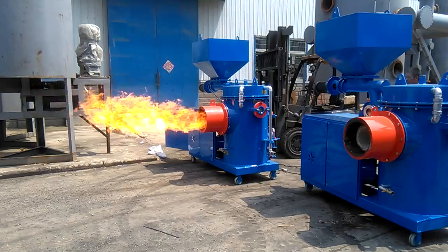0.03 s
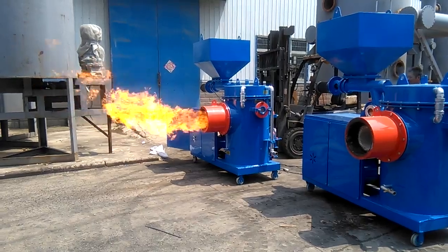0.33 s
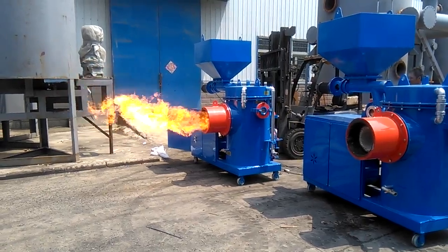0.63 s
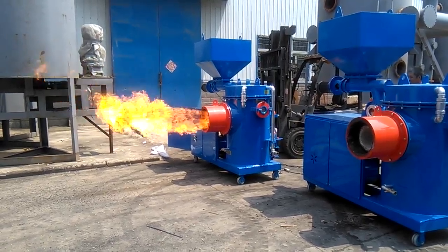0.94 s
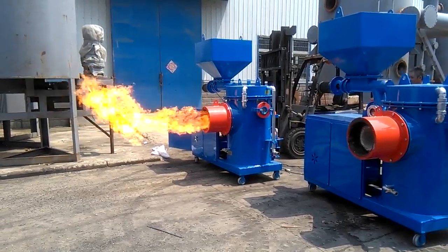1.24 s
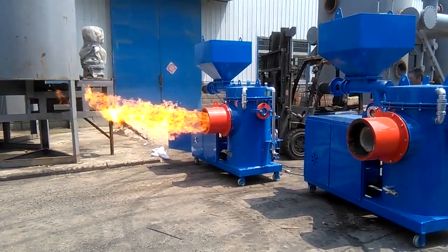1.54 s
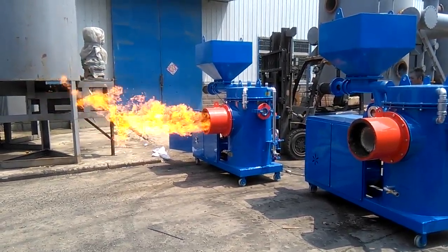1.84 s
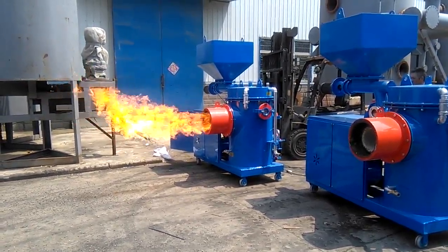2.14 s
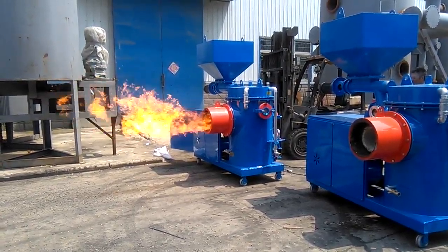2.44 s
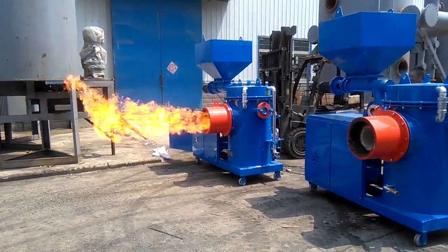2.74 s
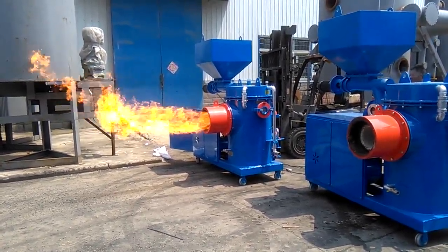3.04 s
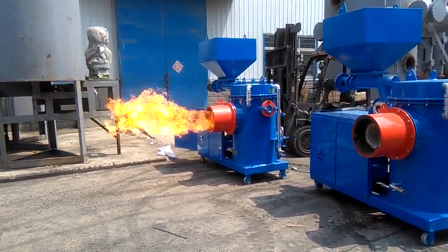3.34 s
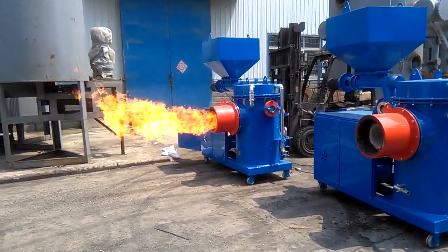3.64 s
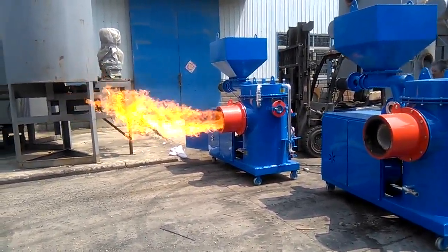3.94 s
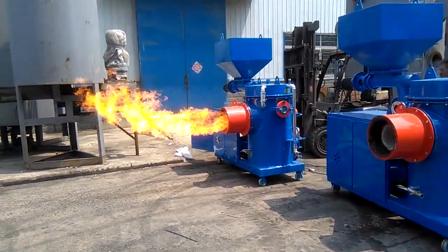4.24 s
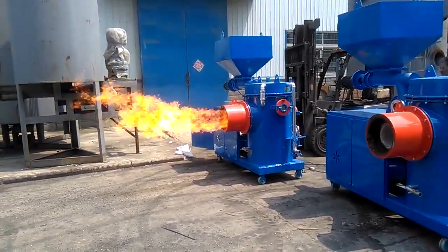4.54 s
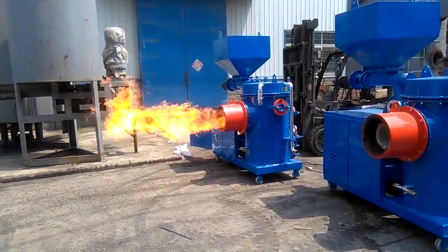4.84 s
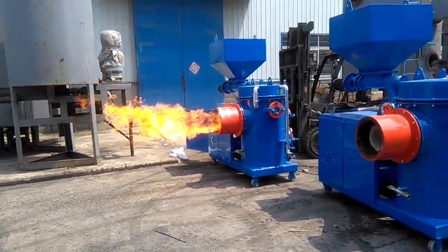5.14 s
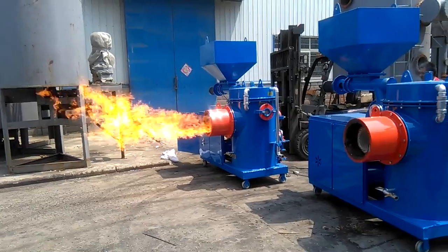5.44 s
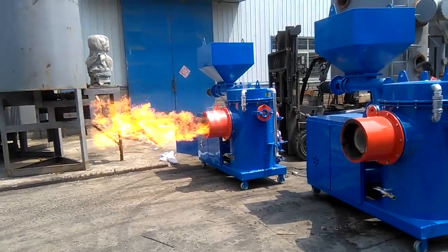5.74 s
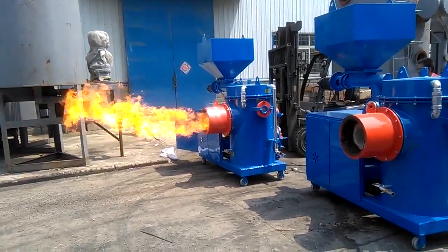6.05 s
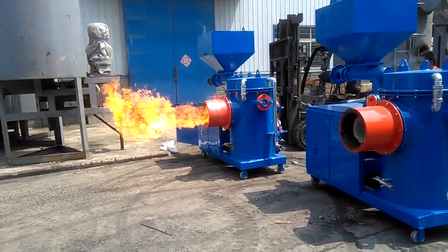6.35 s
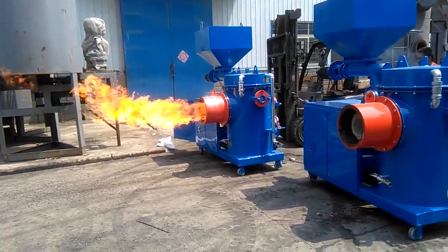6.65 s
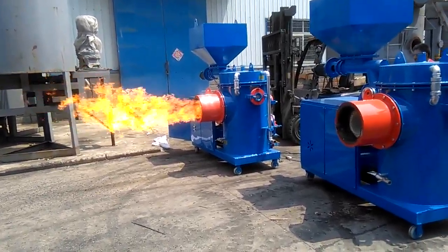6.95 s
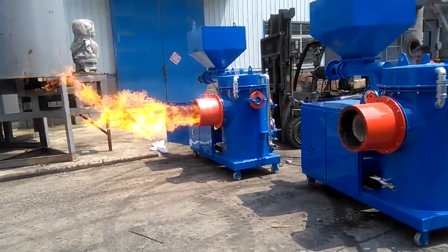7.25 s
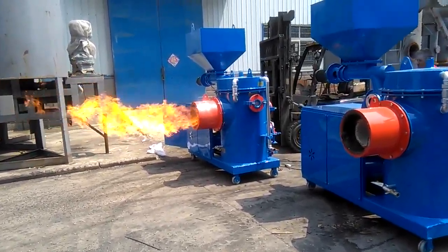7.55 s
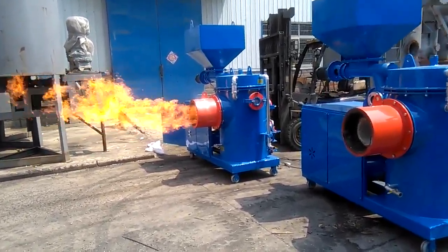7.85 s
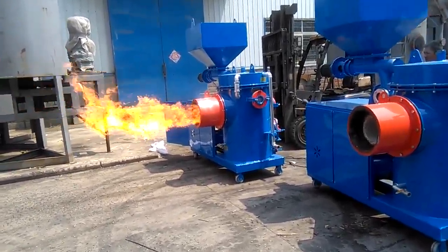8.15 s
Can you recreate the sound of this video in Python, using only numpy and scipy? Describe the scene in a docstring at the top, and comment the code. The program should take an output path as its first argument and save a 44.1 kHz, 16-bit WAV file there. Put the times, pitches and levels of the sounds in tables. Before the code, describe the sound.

A pellet burner runs outdoors, a few metres from a hand-held phone. Its flame rumbles, flares and hoots hollowly in its tube while a blower rushes and faintly whistles, starting abruptly and loud, then turning quieter and duller. Wind buffets the microphone around three seconds in. A thin, high rustle of sliding pellets runs underneath, and faint wavering hollow notes come and go in the second half.

```python
"""A factory yard, where a pellet burner throws a long flame a few metres from a hand-held phone. The flame
rumbles in uneven eddies and rings its fire tube like a big pipe. Air from the blower rushes and whistles. At
about 2 s the sound drops sharply and stays quieter. Pellets rustle down the steel feed chute, and a gust of
wind thumps the microphone. The sound starts abruptly."""
import sys
import numpy as np
from scipy import signal
from scipy.fft import rfft, irfft, next_fast_len
from scipy.io import wavfile
from scipy.ndimage import uniform_filter1d

SR = 44100
rng = np.random.default_rng(int(sys.argv[2]) if len(sys.argv) > 2 else 0)


def output_pcm(signal):
    """Save a mono or channel-first signal as 16-bit PCM at the path in sys.argv[1].

    Samples are clipped to [-1, 1] before scaling.
    """
    pcm = np.clip(np.atleast_2d(signal).T, -1, 1) * 32767
    wavfile.write(sys.argv[1], SR, np.round(pcm).astype(np.int16))


N = 370881
TIME = np.arange(N) / SR
SIZE = next_fast_len(N, True)
FREQ = np.maximum(np.fft.rfftfreq(SIZE, 1 / SR), 1)
FLICKER_PER_S, SWIRL_DB = 11.8, 2.0  # how fast the flame licks; how much hot air bends the levels

# The levels are high at first, then drop suddenly at about 2 s. # Each row: time in seconds, then the levels of
# rumble, drone, roar and howl in dB.
FIRE_LEVELS = [(.63, -26.5, -36, -42.5, -46.5), (1.1, -28.5, -35.5, -40.5, -44.5),
               (1.95, -28, -36.5, -44.5, -42.5), (2.25, -40.5, -47, -47, -71),
               (2.55, -39.5, -48.5, -49.5, -49.5), (2.8, -41, -34, -52.5, -52.5),
               (3.25, -32.5, -35.5, -47.5, -50.5), (3.52, -37, -43, -48.5, -53),
               (4.02, -42.5, -38, -52, -47.5), (4.4, -34.5, -39.5, -45.5, -45), (4.75, -37, -36, -52, -43),
               (5.05, -39, -41, -50.5, -47.5), (5.8, -39.5, -38, -55, -47), (6.15, -44, -38.5, -53.5, -47),
               (6.6, -37.5, -34.5, -56, -49.5), (7.05, -40, -46, -52.5, -46.5),
               (7.7, -38, -40, -47.5, -48.5), (8.1, -37.5, -41.5, -45, -47.5),
               (8.41, -39.5, -41.5, -47.5, -50)]
# Big pockets of gas flare up. Each row: peak time and fade in seconds, thud and boom levels in dB.
FLARES = [(1.115, 0.041, -27, -26.5), (1.389, 0.017, -30, -30.5), (1.555, 0.024, -24, -30.5),
          (1.86, 0.034, -28, -30), (2.59, 0.057, -32, -55), (3.41, 0.017, -31, -37),
          (3.65, 0.035, -32, -41), (4.375, 0.023, -27.5, -42), (4.555, 0.018, -43, -31),
          (4.781, 0.018, -49, -32), (5.36, 0.042, -34.5, -56), (5.7, 0.041, -37, -31),
          (5.781, 0.025, -30, -47), (5.929, 0.01, -29, -33), (5.98, 0.02, -28, -41),
          (6.31, 0.068, -35.5, -35.5), (6.59, 0.043, -47, -37), (6.7, 0.03, -38, -38.5),
          (7.17, 0.016, -32, -44), (7.365, 0.031, -34, -55), (7.515, 0.025, -28.5, -35.5),
          (7.56, 0.042, -41, -35.5), (7.79, 0.04, -31, -42), (7.96, 0.019, -35, -43),
          (8.2, .024, -35.5, -51)]
# The fire tube catches and hoots. Each row: peak time in seconds, level in dB.
HOOTS = [(.8, -40), (1.0, -43), (1.422, -34), (3.25, -41), (3.53, -45), (4.191, -35.5), (4.419, -35),
         (5.289, -36.5), (5.41, -33.5), (6.67, -40), (7.2, -56), (7.79, -37), (7.97, -43), (8.31, -40.5),
         (8.371, -39.5)]
def flame():
    """Pockets of gas ignite: big ones rumble, smaller ones flutter and ring the chamber and the tube."""
    rumble_db, drone_db, roar_db, howl_db = curves(FIRE_LEVELS)
    flutter = undb(1.7 * walk(42))
    rumble, drone = deep_rumble(), chamber_drone(flutter)
    roar, howl = broad_roar(flutter), tube_howl(flutter)
    thuds = [(s, fade_s, db) for s, fade_s, db, _ in FLARES]
    booms = [(s, fade_s, db) for s, fade_s, _, db in FLARES]
    hoots = [(s, .0094, db) for s, db in HOOTS]
    return (rumble * swells(rumble_db + flicker(1.8), thuds, rise_s=.02)
            + drone * swells(drone_db + flicker(.5), booms, rise_s=.02)
            + roar * undb(roar_db + flicker(2.5))
            + howl * swells(howl_db + flicker(.9), hoots, rise_s=.012))


# The tone of the rumble. Each row: frequency in Hz, relative level in dB.
RUMBLE_TONE = [(20, -55), (30, -10), (43, 0), (64, 3), (95, 4.5), (135, -6.5), (170, -12.5), (235, -20),
               (300, -19), (480, -41), (900, -80)]
def deep_rumble():
    """Big burning eddies make a deep noise."""
    return steady(colour(noise(), RUMBLE_TONE), span_s=.0517)


# The tone of the chamber. Each row: frequency in Hz, relative level in dB.
DRONE_TONE = [(110, -12), (160, 2.5), (198, 2), (225, -4.5), (270, -15.5), (340, -15), (420, -20),
              (600, -33.5)]
def chamber_drone(flutter):
    """Tiny pops of gas blur into a low hum inside the chamber."""
    pops = grains(rate=2000, scatter_db=1.5) * flutter
    return steady(colour(pops, DRONE_TONE), span_s=.073)


# The tone of the roar. Each row: frequency in Hz, relative level in dB.
ROAR_TONE = [(200, -3), (300, -7), (450, -0.5), (565, 2), (620, -2), (720, -1.5), (840, -4.5), (890, -9),
             (980, -21), (1300, -25), (2500, -34)]
def broad_roar(flutter):
    """More uneven pops blur into a roar, heard through hot air."""
    pops = grains(rate=1800, scatter_db=3) * flutter
    return steady(swirl(colour(pops, ROAR_TONE), SWIRL_DB), span_s=.25)


# The fire tube's note. Each row: time in seconds, pitch in Hz.
TUBE_PITCH = [(.63, 745), (1.9, 732), (3.1, 731), (4.2, 743), (5.03, 738), (5.14, 817), (5.2, 745),
              (5.27, 789), (5.45, 711), (5.6, 772), (6.08, 727), (6.24, 795), (6.36, 738), (6.55, 803),
              (6.66, 727), (6.85, 768), (7.55, 741), (8.41, 750)]
def tube_howl(flutter):
    """The tube rings with a breathy note that drifts as the flame sways."""
    tube_hz, = curves(TUBE_PITCH)
    wander_hz = 20 * walk(FLICKER_PER_S)
    return steady(whistle(tube_hz + wander_hz, width_hz=100) * flutter, span_s=.086)


# The blower's rush and its whistle. Each row: time in seconds, level in dB.
AIR_LEVELS = [(.63, -41.5), (1.3, -41.5), (1.96, -42), (2.09, -52), (2.22, -55.5), (2.35, -55.5),
              (2.7, -54.5), (3.15, -56.5), (3.3, -54), (3.7, -55.5), (3.93, -55.5), (4.12, -51.5),
              (4.85, -52.5), (5.5, -55.5), (5.8, -53), (6.7, -55), (7.65, -56.5), (7.8, -54), (8.41, -56)]
WHISTLE_LEVELS = [(.63, -51), (2, -61), (2.2, -54), (3, -62), (4, -59), (6.5, -59), (7, -78)]
# The tones of the rush and the nozzle's hiss. Each row: frequency in Hz, relative level in dB.
AIR_TONE = [(250, -12), (460, 12.5), (650, 11.5), (860, 6.5), (1000, 3), (1200, 6.5), (1600, 5),
            (2030, -1.5), (2300, -2), (2850, -3.5), (4000, -2), (4900, -6), (6500, -9), (14000, -30)]
NOZZLE_TONE = [(3900, -15), (4300, -6), (6000, 15), (7500, -18), (10000, -15), (14000, -21.5)]
# Where the duct rings. Each row: frequency in Hz, width in Hz, boost in dB.
DUCT_RINGS = [(1240, 30, 3), (2310, 170, 4.2), (2660, 110, 4.8), (3250, 220, 2), (3800, 130, 3.6),
              (4020, 110, 3.4), (4300, 50, 2.5), (4960, 70, 2.6)]
def blower():
    """Air rushes through the duct and whistles at its edge."""
    air_db, = curves(AIR_LEVELS)
    whistle_db, = curves(WHISTLE_LEVELS)
    # The rush drops sharply at about 2 s, then sounds duller and more fluttery.
    drop_db = air_db.max() - air_db
    flutter = undb((.4 + .07 * drop_db) * walk(35))
    swirl_db = 1.3 + .08 * drop_db
    air = colour(swirl(noise(), swirl_db) * flutter, AIR_TONE, DUCT_RINGS) * undb(air_db)
    jet = swirl(spread(noise(), noise(), width=.12), swirl_db)
    hiss = colour(jet, NOZZLE_TONE) * undb(air_db - 20.5 - .74 * drop_db)
    return air + hiss + whistle(732, width_hz=20) * undb(whistle_db)


# One hollow note comes and goes. Each row: time in seconds, relative level in dB, pitch in Hz.
HOLLOW_NOTE = [(3.9, -62, 1470), (4.4, -57, 1470), (4.87, -54.5, 1540), (5.2, -57, 1572),
               (5.6, -57.5, 1567), (6.2, -65, 1540), (6.8, -86, 1539), (7.62, -63, 1540),
               (7.78, -51.5, 1484), (8.1, -50, 1486), (8.41, -56.5, 1500)]
# Other passing notes. Each row: start and end in seconds, pitch and width in Hz, peak level in dB.
JET_NOTES = [(.2, 2.15, 1240, 190, -55), (.3, 3.15, 944, 22, -64), (1.87, 2.9, 600, 67, -59),
             (3.5, 3.77, 550, 65, -52), (4.0, 5.2, 2280, 260, -68), (4.1, 5.1, 2650, 260, -71),
             (4.5, 5.9, 5000, 1100, -67), (5.3, 6.1, 2740, 250, -67.5), (4.3, 7.44, 354.4, 114, -50),
             (7.85, 8.7, 300, 110, -52), (4.9, 7.5, 1110, 231.5, -62.5), (5.6, 7.5, 1773, 139, -66),
             (6.15, 7.2, 2260, 230, -67), (6.57, 9, 3100, 420, -70), (6.5, 8.8, 3900, 380, -69.5),
             (6.6, 7.25, 5100, 2600, -66.5), (7.6, 8.9, 2380, 280, -67.5), (7.65, 8.5, 1745, 150, -60.5),
             (7.8, 9.4, 1190, 260, -59.5)]
def jet_overtones():
    """As the flame sways, hollow notes of the jet swell, waver and die away."""
    hollow_db, hollow_hz = curves(HOLLOW_NOTE)
    fade_in = np.clip((TIME - HOLLOW_NOTE[0][0]) / .18, 0, 1)
    out = whistle(hollow_hz, width_hz=144) * undb(hollow_db - 3.5 + walk(25)) * fade_in
    bend = 1 + .014 * walk(3)
    for start, end, hz, width_hz, db in JET_NOTES:
        progress = np.clip((TIME - start) / (end - start), 0, 1)
        arch = np.sqrt(4 * progress * (1 - progress))
        out += whistle(hz * bend, width_hz) * undb(db + 1.8 * walk(22)) * arch
    return swirl(out, SWIRL_DB)


# The flow of pellets. Each row: time in seconds, rustle level in dB.
FEED_LEVELS = [(.63, -58), (1.3, -55), (2.25, -56), (2.39, -59.5), (2.55, -55.5), (3.9, -57), (4.13, -54),
               (4.35, -56), (4.85, -54), (5.35, -62.5), (5.85, -58.5), (6.1, -62.5), (6.65, -62),
               (6.76, -57.5), (7.12, -61.5), (7.25, -62.5), (7.5, -72), (7.62, -67.5), (8.02, -60.5),
               (8.2, -71)]
# The tones of the rustle and its finer grit. Each row: frequency in Hz, relative level in dB.
RUSTLE_TONE = [(3000, -38), (5200, -33), (6700, 0), (7500, 9), (8500, 9.5), (9400, 4.5), (10200, -21),
               (12000, -23), (14000, -31)]
GRIT_TONE = [(4300, -59), (5600, 4.5), (6600, 2), (8000, -19), (9500, 12), (10700, 10), (11500, 9.5),
             (12100, 2), (12700, 5), (13400, 4.5), (14300, -14)]
# Where the chute rings. Each row: frequency in Hz, width in Hz, boost in dB.
CHUTE_RINGS = [(7280, 110, 2.5), (7960, 200, 2), (8037, 30, 4.5)]
def pellet_rustle(width):
    """Countless pellets tap along the steel chute in uneven spurts and make it ring."""
    flow_db, = curves(FEED_LEVELS)
    rustle_db = flow_db + .8 * walk(17)
    taps = spread(grains(rate=4500, scatter_db=1), noise(), width) * undb(walk(45))
    rustle = colour(taps, RUSTLE_TONE, CHUTE_RINGS) * undb(rustle_db)
    grit_db = flow_db.max() + 1.16 * (rustle_db - flow_db.max()) - 4.5  # drops faster than the rustle
    grit = colour(taps, GRIT_TONE) * undb(grit_db + 1.4 * walk(25))
    ring = whistle(8000, width_hz=160) * undb(rustle_db - 12.5 + 4.8 * walk(12))
    return rustle + grit + ring


# Sudden slips. Each row: start in seconds, level in dB, fade in seconds.
SLIPS = [(.775, -52, 0.11), (1.148, -47.5, 0.041), (1.409, -47, 0.051), (1.905, -55, 0.022),
         (2.0, -57, 0.034), (2.418, -45, 0.094), (2.823, -48, 0.023), (3.239, -50, 0.098),
         (4.558, -48, 0.011), (5.186, -51, 0.039), (5.411, -54, 0.038), (5.455, -55, 0.024),
         (5.503, -51.5, 0.038), (5.804, -49, 0.016), (6.255, -52, 0.01), (6.394, -48, 0.03),
         (6.706, -50.5, 0.036), (6.757, -51, 0.015), (7.575, -59, 0.1), (7.764, -56, 0.021),
         (7.968, -51, 0.021), (8.022, -56, .015)]
# The tones of a slip and of its first tick. Each row: frequency in Hz, relative level in dB.
SLIP_TONE = [(3000, -50), (5800, 4), (7500, 12), (9000, 13.5), (11500, 7), (14000, -7)]
TICK_TONE = [(6000, -20), (9000, 6), (11500, -2), (14000, -4)]
def pellet_slips(width, rise_s=.0037, tick_fade_s=.0066):
    """Pellets slip in a rush; two hard slips open with a bright tick of first contact."""
    rush, contact = np.zeros(N), np.zeros(N)
    for s, db, fade_s in SLIPS:
        age = np.maximum(TIME - s, 0)
        rush += undb(db) * np.minimum(age / rise_s, 1) * np.exp(-age / fade_s)
    for s, db in [(2.423, -39), (3.244, -44)]:
        contact += undb(db) * (TIME > s) * np.exp(-np.abs(TIME - s) / tick_fade_s)
    slide = spread(grains(rate=11000, scatter_db=1), noise(), width)
    tick = spread(noise(), noise(), width)
    return colour(slide, SLIP_TONE) * rush + colour(tick, TICK_TONE) * contact


# Puffs of wind. Each row: start and length in seconds, level in dB, upper edge of the sound in Hz.
BUFFETS = [(2.754, 0.026, -25.5, 414), (2.771, 0.045, -20.5, 147), (2.826, 0.03, -22.5, 280),
           (2.848, 0.064, -26, 405), (2.921, 0.0094, -26, 224), (2.953, 0.026, -28, 200),
           (2.987, 0.044, -21.5, 567), (3.04, 0.047, -35, 178), (3.098, 0.017, -25, 520),
           (3.103, 0.01, -20.5, 199), (3.128, 0.018, -26, 200), (3.166, 0.0082, -24, 340),
           (3.204, 0.02, -22.5, 516), (3.221, 0.017, -25.5, 127), (3.249, 0.064, -30.5, 140),
           (3.768, 0.029, -20.5, 147), (3.8, 0.032, -29, 192), (3.847, 0.018, -29, 397)]
# The tone of the gust. Each row: frequency in Hz, relative level in dB.
GUST_TONE = [(35, -8), (55, -3.5), (110, -2), (175, -0.5), (250, -5), (400, -7.5), (600, -14.5)]
def wind(rise_s=.003, fall_s=.0059):
    """Each eddy of a gust shakes the microphone in a short, dull burst; faster eddies reach higher."""
    gust, out = colour(noise(), GUST_TONE), np.zeros(N)
    for s, length_s, db, edge_hz in BUFFETS:
        near = slice(int(s * SR) - SR // 4, int(s * SR) + SR // 4)
        age = TIME[near] - s
        lowpass = signal.butter(8, edge_hz, fs=SR, output="sos")
        eddy = signal.sosfilt(lowpass, np.roll(gust, rng.integers(N))[near])
        burst = np.clip(age / rise_s, 0, 1) * np.exp(-np.maximum(age - length_s, 0) / fall_s)
        out[near] += steady(eddy, span_s=.0194) * burst * undb(db)
    return signal.sosfilt(signal.butter(3, 35, "highpass", fs=SR, output="sos"), out)


def wall_echo(x, delay_ms, sway_ms, echo_db):
    """Add a bounce off nearby steel; its path drifts as the hand sways, slowly shifting the tone."""
    lag_s = (delay_ms + sway_ms * walk(.5)) / 1000
    return x + undb(echo_db) * np.interp(TIME - lag_s, TIME, x.mean(axis=0))


def swirl(x, depth_db, patch_hz=260, patch_s=.06):
    """Sound crosses eddies of hot air, so small patches of its spectrum swell and fade on their own."""
    hz, s, spectrum = signal.stft(x, SR, nperseg=1024)
    across = np.fft.fftfreq(len(hz), hz[1]) * patch_hz
    along = np.fft.fftfreq(len(s), s[1]) * patch_s
    blur = np.exp(-2 * (across[:, None] ** 2 + along ** 2))
    patches = unit(np.fft.ifft2(np.fft.fft2(rng.standard_normal(blur.shape)) * blur).real)
    gain = undb(np.interp(s, TIME, depth_db * np.ones(N)) * patches)
    return signal.istft(spectrum * gain / np.sqrt(np.mean(gain ** 2, axis=0)), SR)[1][..., :N]


def swells(level_db, events, rise_s):
    """The gain of a running level with short swells on top; their powers add."""
    power = undb(level_db) ** 2
    for s, fade_s, db in events:
        age = TIME - s
        distance = age / np.where(age < 0, rise_s, fade_s)
        power += undb(db) ** 2 * np.exp(-np.minimum(distance ** 2, 100))
    return np.sqrt(power)


def flicker(depth_db):
    """A level in dB that wavers as the flame licks about."""
    return depth_db * walk(FLICKER_PER_S)


def whistle(hz, width_hz):
    """Noise ringing around one pitch, which may move; wider is breathier."""
    ring = np.fft.ifft(rfft(noise(), SIZE) / (1 + (FREQ / width_hz) ** 2) ** 2, SIZE)[:N].real
    other = np.roll(ring, N // 2)
    phase = 2 * np.pi * np.cumsum(hz * np.ones(N)) / SR
    return unit(ring * np.cos(phase) + other * np.sin(phase))


def colour(x, tone, rings=()):
    """Give x a broad tone with ringing peaks on top, at strength one."""
    hz, db = np.transpose(tone)
    peaks_db = sum(boost / (1 + (2 * (FREQ - centre) / width) ** 2) for centre, width, boost in rings)
    shape_db = np.interp(np.log(FREQ), np.log(hz), db) + peaks_db
    roll_off = np.minimum(FREQ / hz[0], 1) ** 2 * np.minimum(hz[-1] / FREQ, 1) ** 2
    return unit(irfft(rfft(x, SIZE) * undb(shape_db) * roll_off, SIZE)[..., :N])


def grains(rate, scatter_db):
    """Random clicks of mixed sizes, about rate a second."""
    hits = rng.random(N) < rate / SR
    return unit(hits * np.sign(noise()) * undb(scatter_db * np.clip(noise(), -2, 2)))


def steady(x, span_s):
    """Even out the loudness over span_s, keeping faster flutter."""
    return x / np.sqrt(uniform_filter1d(x ** 2, max(int(span_s * SR), 2)) + 1e-9)


def spread(centre, apart, width):
    """Left and right from a shared sound and an unrelated one."""
    return (centre + width * apart * np.array([[1], [-1]])) / np.hypot(1, width)


def walk(rate):
    """A smooth random wobble of strength one, changing about rate times a second."""
    return unit(irfft(rfft(noise(), SIZE) / (1 + (FREQ / rate) ** 2) ** 2, SIZE)[:N])


def curves(table):
    """Join a table's timed rows with straight lines, one curve per value column."""
    s, *columns = np.transpose(table)
    return [np.interp(TIME, s, column) for column in columns]


def noise():
    """White noise."""
    return rng.standard_normal(N)


def unit(x):
    """Scale to an average strength (rms) of one."""
    return x / np.sqrt(np.mean(x ** 2))


def undb(db):
    """Decibels to gain."""
    return 10 ** (np.asarray(db) / 20)


def scene():
    """Flame, blower and wind sit in the centre; only the nozzle's hiss and the pellets spread out."""
    burner = flame() + blower() + jet_overtones()
    yard = wall_echo(burner, delay_ms=15.5, sway_ms=.34, echo_db=-13.5) + wind()
    pellets = pellet_rustle(width=.53) + pellet_slips(width=.53)
    return yard + swirl(pellets, SWIRL_DB)


def record(dry, start_s=.622, ceiling=.26, top_hz=14200):
    """The phone opens abruptly, rounds off the loudest peaks and cuts the highest treble."""
    rounded = dry / (1 + (dry / ceiling) ** 4) ** .25
    opening = np.clip((TIME - start_s) / .0015, 0, 1)
    return signal.sosfilt(signal.ellip(12, .2, 80, top_hz, fs=SR, output="sos"), rounded * opening)


dry = scene()
out = record(dry)
output_pcm(out)
```